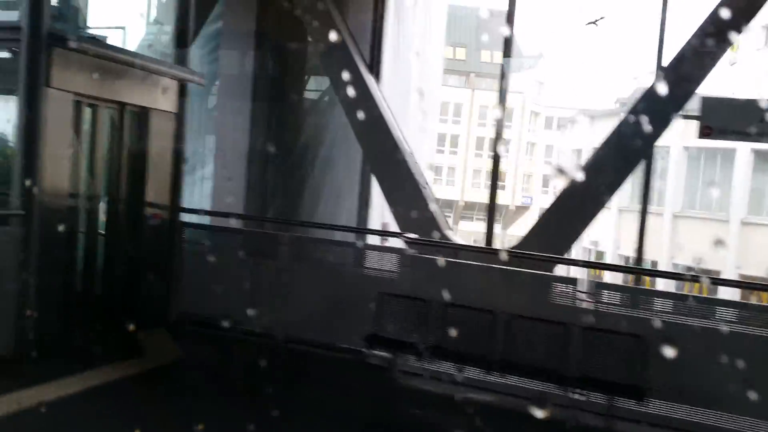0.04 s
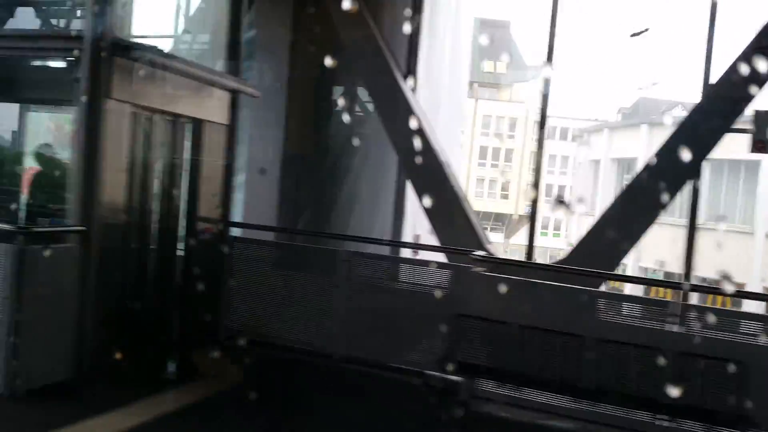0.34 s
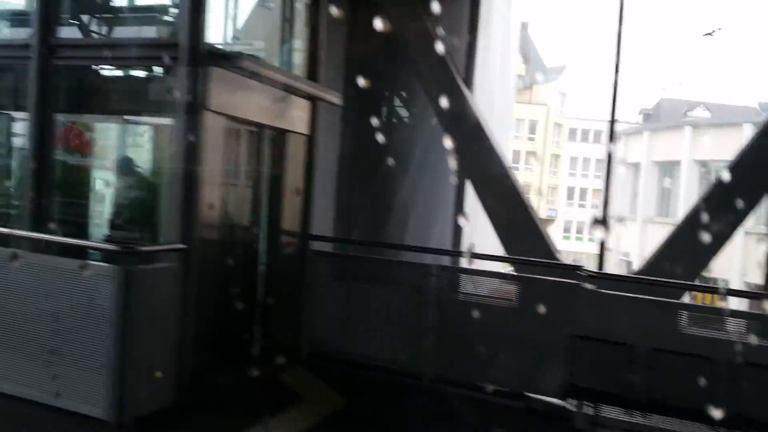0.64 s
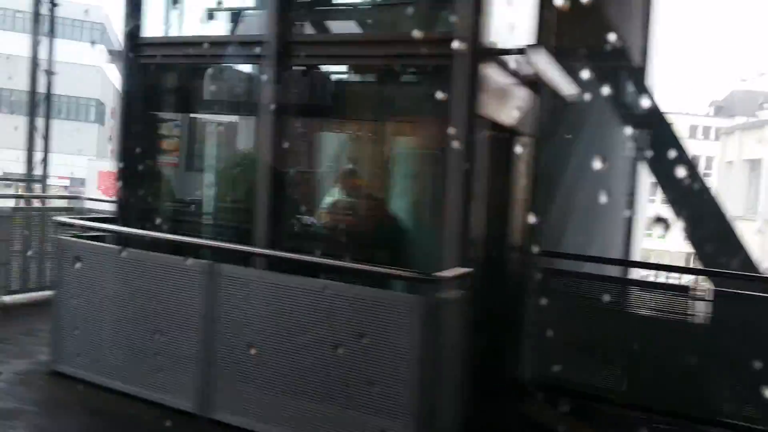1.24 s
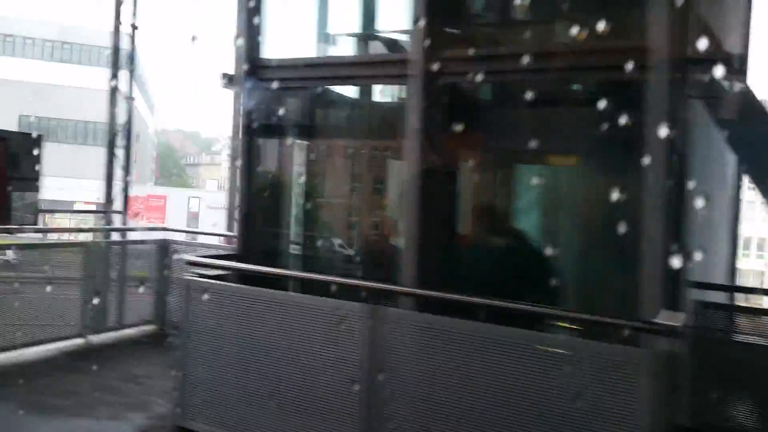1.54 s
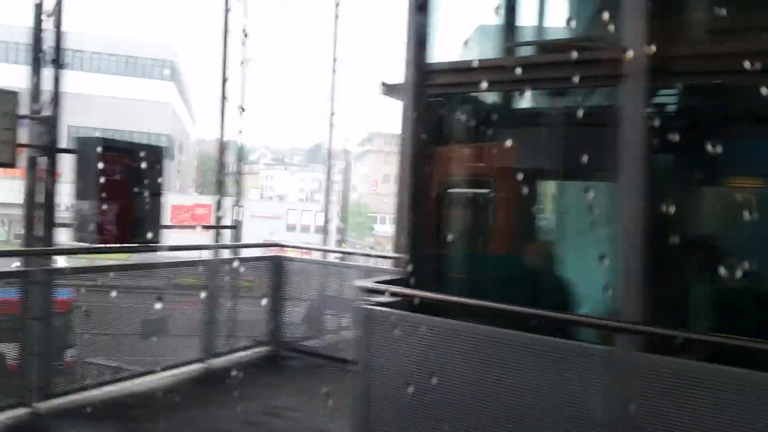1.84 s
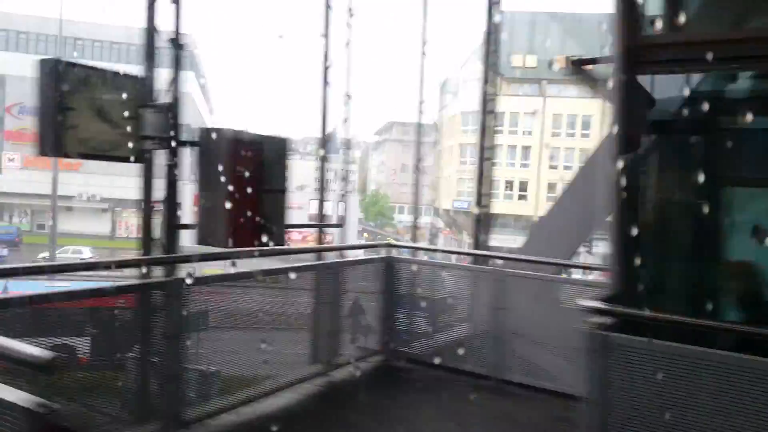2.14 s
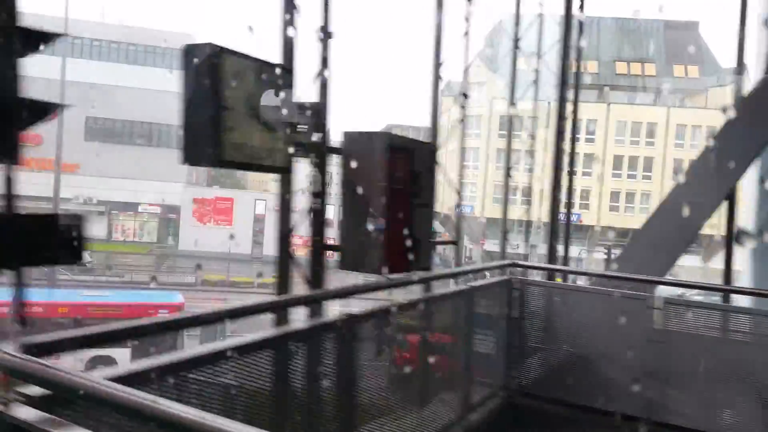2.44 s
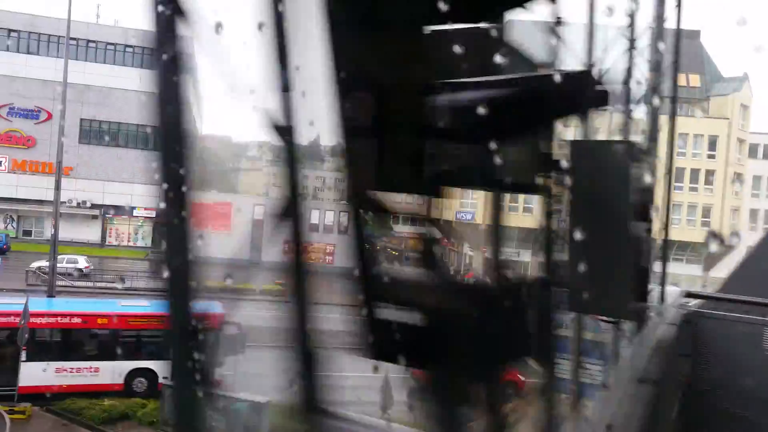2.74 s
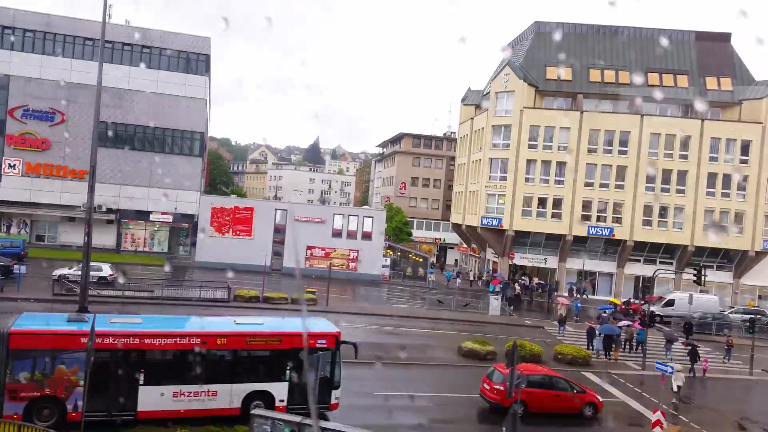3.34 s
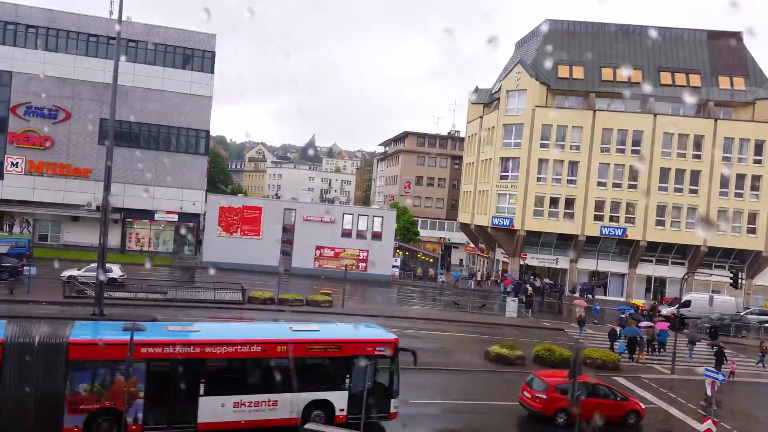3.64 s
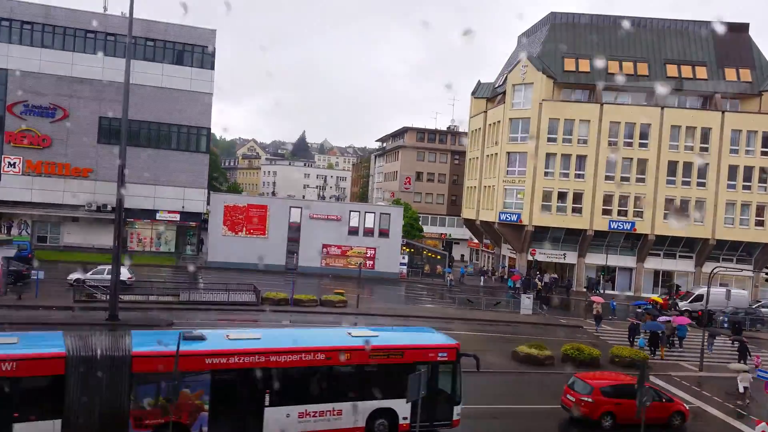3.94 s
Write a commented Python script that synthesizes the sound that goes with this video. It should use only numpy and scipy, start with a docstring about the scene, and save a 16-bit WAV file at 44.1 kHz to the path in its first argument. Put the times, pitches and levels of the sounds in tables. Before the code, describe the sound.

A suspended train hums and rumbles, heard from inside, with deep booms and thuds.

```python
"""Inside a suspended railway carriage as it rolls out of a station.
From the start the traction drive hums on one steady note, over the rumble of the wheels overhead and a
thin rolling hiss. About a second in, rough rail sends booms down into the body, with a deep heave and
two rail-joint thuds. More jolts follow, and a last heave and thud land near 3.5 s.
All along, the running gear knocks now and then and the fittings give a few faint ticks and squeaks."""
import sys
import numpy as np
from scipy import signal
from scipy.fft import rfft, irfft
from scipy.io import wavfile
from scipy.ndimage import uniform_filter1d, minimum_filter1d

SR = 44100
rng = np.random.default_rng(int(sys.argv[2]) if len(sys.argv) > 2 else 0)


def materialize(psi):
    """Save the field psi as 16-bit PCM at rate SR to the path in sys.argv[1].

    A 1-D psi becomes a single channel; in a 2-D psi each row is a channel.
    """
    bounded = np.clip(np.atleast_2d(psi).T, -1, 1)
    quanta = np.round(bounded * 32767).astype(np.int16)
    wavfile.write(sys.argv[1], SR, quanta)


N = 176400
T = np.arange(N) / SR


def drive():
    """The traction drive hums a strong, nearly pure note; weak overtones fade in and out above it."""
    # strength of the note: time_s, level_db
    hum_level = [(0.03, -19.5), (0.06, -15.5), (0.19, -18.5), (0.35, -15.5), (1.26, -14.5), (1.51, -13),
                 (3.36, -14.5), (3.56, -17.5), (3.9, -17.5)]
    # swells of the two strongest overtones: time_s, second_db, third_db
    swell_levels = [(0, -45.5, -48), (.3, -40.5, -59), (.7, -51, -48.5), (1.0, -46.5, -45.5),
                    (1.35, -52.5, -45), (1.75, -48, -43.5), (2.1, -49, -45.5), (2.45, -49.5, -53.5),
                    (2.85, -46.5, -55), (3.25, -45.5, -44.5), (3.7, -45, -42.5), (4, -50.5, -50.5)]
    # their stereo places: harmonic, pan_db, left_lead_rad
    places = [(2, 10.5, 0.68), (3, 13, 2.4)]
    # weaker overtones: harmonic, level_db, pan_db, left_lead_rad
    overtones = [(4, -50.5, 6, 1.95), (5, -61, 12, 2.4), (6, -59.5, 4.5, 2)]
    hum_hz, whine_hz, hum_pan_db = 249.9, 599, 1.3
    phase = 2 * np.pi * hum_hz * T + .14 * drift(1.3)
    hum = tone(phase, in_time(hum_level) - .4 * drift(24), hum_pan_db, lead_rad=.47)
    times, *swells = np.transpose(swell_levels)
    strong = [(k, np.interp(T, times, db), pan_db, lead) for (k, pan_db, lead), db in zip(places, swells)]
    weak = [(k, db + 2.5 * np.tanh(drift(4)), pan_db, lead) for k, db, pan_db, lead in overtones]
    for k, db, pan_db, lead in strong + weak:
        hum += tone(round(k) * phase + .15 * drift(1.1), db + 1.5 * drift(6.8), pan_db, lead)
    whine_phase = 2 * np.pi * whine_hz * T + .5 * drift(.85)  # a faint second motor tone
    return hum + tone(whine_phase, -54.5 + 2 * drift(1.6), hum_pan_db, lead_rad=1)


def wheels():
    """The wheels shake the body: even rumble, booms on rough rail, deep heaves and rail-joint thuds."""
    # even rolling rumble: time_s, level_db
    roll_level = [(0, -15.5), (.36, -20), (.6, -18.5), (1.0, -18.5), (1.65, -18), (2.3, -16), (2.8, -17),
                  (4, -16)]
    # its colour through the carriage body: frequency_hz, density_db
    body_colour = [(15, -11), (27, -7), (39, 0.5), (49, -11), (68, 3.5), (97, 2), (120, 0), (135, -3.5),
                   (155, -1), (200, -8.5), (270, -11), (330, -19), (450, -26.5), (650, -30.5),
                   (1000, -41.5), (2000, -79.5)]
    # rough stretches of rail: start_s, hold_s, level_db
    jolts = [(0.113, .10, -14.5), (.44, .05, -16.5), (1.037, 0.11, -9), (1.191, 0.088, -13),
             (1.44, 0.051, -17.5), (1.921, 0.06, -9), (2.076, 0.056, -17), (2.355, 0.086, -17),
             (2.496, 0.1, -8.5), (2.73, 0.035, -20), (2.945, 0.26, -13.5), (3.462, 0.044, -10),
             (3.555, 0.22, -17.5), (3.827, 0.025, -9.5), (3.911, 0.05, -8)]
    # boom of the body on a jolt: frequency_hz, density_db
    boom_colour = [(20, -18), (39, -6), (52, -8.5), (70, 0.5), (97, 3.5), (118, 2.5), (135, -12),
                   (155, -1.5), (200, -15), (270, -11.5), (330, -27.5), (450, -31.5), (650, -43),
                   (1000, -56), (2000, -86.5)]
    # heaves of the suspended body: start_s, level_db
    heaves = [(1.03, -20.5), (1.86, -20), (1.92, -17), (3.019, -17), (3.45, -14.5)]
    # heavy thuds at rail joints: centre_s, peak_db
    thuds = [(1.048, -7), (1.213, -10.5), (3.488, -13)]
    heave_hz, thud_width_s, diffuse_db, right_lag_s = 39, .0024, -18.5, .00025
    roll = from_db(in_time(roll_level))
    jolt = sum(from_db(db) * burst(s, .046, hold_s, release_s=.022) for s, hold_s, db in jolts)
    shake = roll * shaking(body_colour) + jolt * shaking(boom_colour)
    heave = sum(from_db(db) * burst(s, .025, hold_s=.045, release_s=.015) for s, db in heaves)
    shake += heave * np.sin(2 * np.pi * heave_hz * T + drift(18))
    for centre_s, db in thuds:
        u = (T - centre_s) / thud_width_s
        shake -= from_db(db) * u * np.exp((1 - u * u) / 2)  # one push and one pull
    diffuse = from_db(diffuse_db) * (roll + jolt) * noise(body_colour)[0]
    left = shake + diffuse
    right = np.interp(T - right_lag_s, T, shake) - diffuse
    return pan(db=1.2) * np.array([left, right])


def knocks():
    """The running gear overhead gives short, dull knocks."""
    # knocks: start_s, level_db
    hits = [(.122, -34.5), (1.058, -37), (1.185, -36), (3.159, -35.5), (3.175, -33), (3.93, -49)]
    # their dull ring: frequency_hz, density_db
    colour = [(150, -4.5), (320, -7.5), (480, 2.5), (660, -2.5), (900, -12), (1500, -18), (4000, -40),
              (9000, -53.5)]
    force = sum(from_db(db) * burst(s, .006, hold_s=.012, release_s=.004) for s, db in hits)
    return pan(db=7) * force * noise(colour)


def cabin():
    """Rolling noise fills the cabin under a high fizz; the treble wavers and leans to the left."""
    # rolling noise: frequency_hz, left_density_db, right_density_db
    roll_colour = [(191, -4.5, -0.5), (397, -8, -2), (620, -5, -7.5), (800, -3, -6.5), (1050, -2.5, -8),
                   (1320, -0.5, -11.5), (1550, -6, -18.5), (1750, -4.5, -18), (1990, -10.5, -22),
                   (2820, -16.5, -24.5), (4040, -19.5, -29), (5100, -29, -36.5), (6600, -35.5, -47),
                   (9000, -40.5, -55), (16000, -52.5, -59)]
    # rise and fall of its treble: time_s, gain_db
    treble_gain = [(0, -1), (.5, 1.5), (1.1, -0.5), (1.7, 2.5), (2.6, 0), (3.3, -2), (4, -4.5)]
    # high fizz: frequency_hz, left_density_db, right_density_db
    fizz_colour = [(5000, -31, -42), (7200, -12.5, -34.5), (8130, -6.5, -28.5), (8860, 0.5, -21.5),
                   (9600, -1.5, -22), (10900, -7, -25.5), (12700, -4.5, -17.5), (14200, -10.5, -18.5),
                   (15500, -3.5, -7.5)]
    # contour of the fizz before its boost: time_s, level_db
    fizz_level = [(0.05, -62), (0.44, -59.5), (0.8, -62.5), (1.32, -60), (1.49, -59.5), (2.81, -59.5),
                  (2.97, -63.5), (3.58, -63), (3.95, -65)]
    roll_db, fall_db_per_s, flicker_db, fizz_boost_db = -40, .16, .84, 8.5
    roll = from_db(roll_db - fall_db_per_s * T + flicker_db * drift(8.8)) * noise(roll_colour)
    low = lowpass(roll, cutoff_hz=3500)
    treble = from_db(in_time(treble_gain)) * (roll - low)
    fizz = from_db(in_time(fizz_level) + fizz_boost_db + .7 * drift(25)) * noise(fizz_colour)
    return low + treble + fizz


def fittings():
    """The fittings give tiny dry ticks and brief, very high squeaks."""
    # ticks: start_s, level_db, decay_s, pan_db
    ticks = [(.137, -61, .002, -12), (1.943, -58.5, .002, -11), (2.325, -52, .02, 11),
             (2.394, -51, .002, 2), (3.272, -44, 0.0019, 20), (3.279, -45, .006, 22.5),
             (3.551, -54.5, 0.024, 17)]
    # their bright colour: frequency_hz, density_db
    tick_colour = [(1000, 15), (2500, 9), (4000, -2.5), (6000, -12.5), (8800, 4.5), (11000, -0.5),
                   (15000, -4.5)]
    # the four tones of a squeak: pitch_hz
    pitches = [8530, 12290, 14660, 15300]
    # squeaks: start_s, length_s, then level_db for each tone
    squeaks = [(.49, .03, -85.5, -91, -90, -59.5), (1.10, 0.054, -75, -83.5, -90.5, -60.5),
               (1.415, .04, -61, -65, -53.5, -83.5), (2.80, .07, -62.5, -65, -62, -89),
               (2.89, 0.065, -66, -57.5, -63.5, -83)]
    taps = sum(pan(pan_db) * from_db(db) * burst(s, .001, .001, decay) for s, db, decay, pan_db in ticks)
    sound = taps * noise(tick_colour)
    for k, hz in enumerate(pitches):
        rub = sum(from_db(db[k]) * burst(s + .01, .015, length / 2, .012) for s, length, *db in squeaks)
        phase = 2 * np.pi * hz * T + 1.5 * drift(36)
        sound += rub * tone(phase, db=0, pan_db=10.5, lead_rad=1)
    return sound


def whistle():
    """A thin, very high whistle wavers far in the background."""
    pitch_hz, level_db = 15538, -74
    return tone(2 * np.pi * pitch_hz * T + drift(5), level_db + 2 * drift(5), pan_db=0, lead_rad=.88)


def shaking(colour, window_s=.06, evenness=.65):
    """Vibration of the body with its slow random swings partly evened out; rms 1."""
    shake = noise(colour)[0]
    power = uniform_filter1d(shake ** 2, int(window_s * SR))
    return rms_one(shake / power ** (evenness / 2))


def noise(colour):
    """Coloured noise, one channel per density column, rolled off below the first row; rms 1."""
    hz, *columns = np.transpose(colour)
    bins_hz = np.arange(N // 2 + 1) * SR / N + 1e-3
    gains = from_db([np.interp(np.log(bins_hz), np.log(hz), db) for db in columns])
    gains /= np.sqrt(1 + (hz[0] / bins_hz) ** 4)
    white = rng.standard_normal((len(columns), N))
    return rms_one(irfft(rfft(white) * gains, N))


def drift(rate_hz):
    """Smooth random wander with a spread of 1."""
    step, run_in = 40, 2000
    pole = np.exp(-2 * np.pi * rate_hz * step / SR)
    white = rng.standard_normal(N // step + run_in + 2)
    slow = signal.lfilter([1], [1, -2 * pole, pole * pole], white)[run_in:]
    return np.interp(np.arange(N) / step, np.arange(len(slow)), rms_one(slow - slow.mean()))


def burst(start_s, attack_s, hold_s, release_s):
    """Envelope: a linear rise centred on the start, a hold, an exponential fall."""
    rise = np.clip((T - start_s) / attack_s + .5, 0, 1)
    return rise * np.exp(-np.maximum(T - start_s - hold_s, 0) / release_s)


def tone(phase, db, pan_db, lead_rad):
    """A panned sine whose left side leads in phase."""
    offsets = np.array([[lead_rad], [-lead_rad]]) / 2
    return np.sqrt(2) * from_db(db) * pan(pan_db) * np.sin(phase + offsets)


def pan(db):
    """Stereo gains for a level difference; positive is left."""
    return from_db(np.array([[db], [-db]]) / 2)


def lowpass(x, cutoff_hz):
    """Gentle low-pass without phase shift."""
    return signal.sosfiltfilt(signal.butter(2, cutoff_hz, fs=SR, output="sos"), x)


def in_time(rows):
    """Join (time_s, value) points by straight lines."""
    return np.interp(T, *np.transpose(rows))


def from_db(db):
    """Decibels to gain."""
    return 10 ** (np.asarray(db) / 20)


def rms_one(x):
    """Scale to rms 1."""
    return x / np.sqrt(np.mean(x ** 2) + 1e-20)


def scene():
    """Drive, wheels and cabin sounds together."""
    return drive() + whistle() + wheels() + knocks() + cabin() + fittings()


def record(dry):
    """A limiter ducks the bass on the highest peaks; the top end is cut steeply."""
    ceiling, span, cutoff_hz = .92, int(.012 * SR), 15850
    headroom = np.minimum(1, ceiling / (np.abs(dry).max(axis=0) + 1e-9))
    held = minimum_filter1d(headroom, 2 * span)
    gain = uniform_filter1d(uniform_filter1d(held, span), span)
    limited = dry - (1 - gain) * lowpass(dry, cutoff_hz=500)
    padded = np.pad(limited, ((0, 0), (SR // 10, 0)), mode="reflect", reflect_type="odd")
    high_cut = signal.ellip(12, .1, 80, cutoff_hz, fs=SR, output="sos")
    return signal.sosfilt(high_cut, padded)[:, -N:]  # the filter settles during the padding


dry = scene()
out = record(dry)
materialize(out)
```